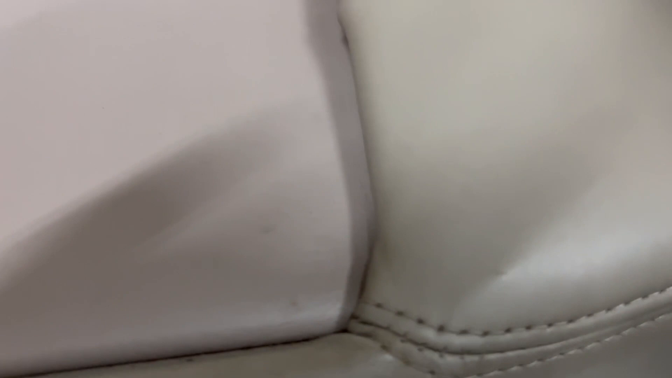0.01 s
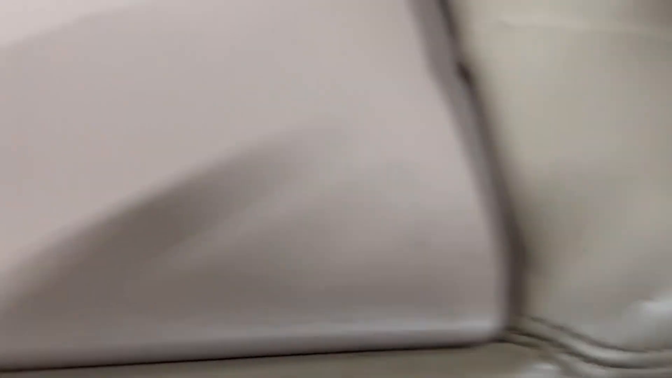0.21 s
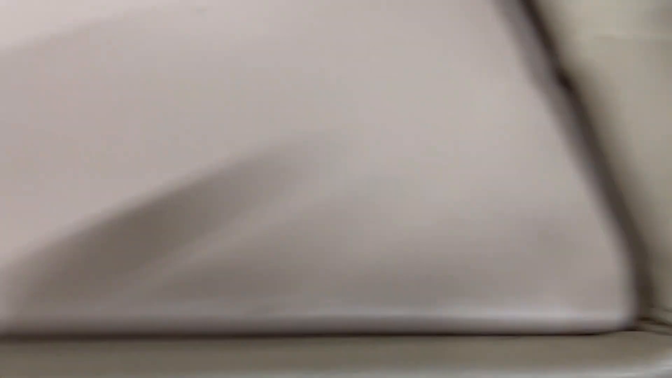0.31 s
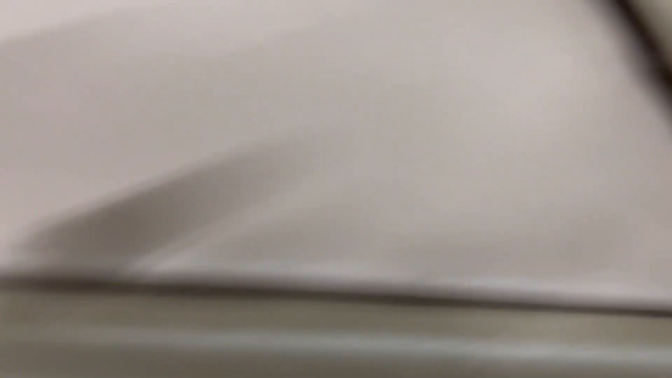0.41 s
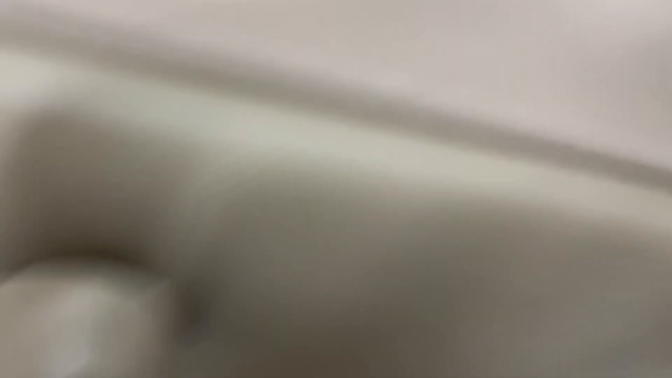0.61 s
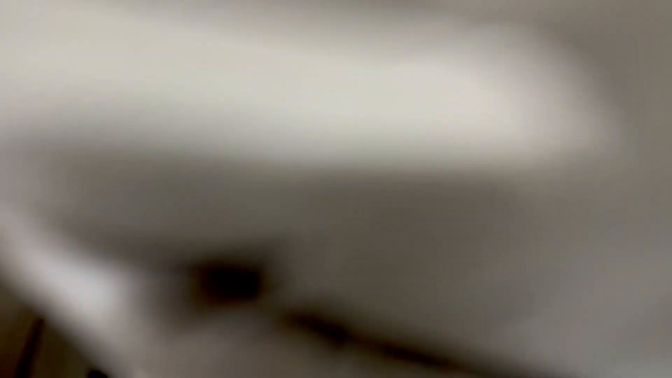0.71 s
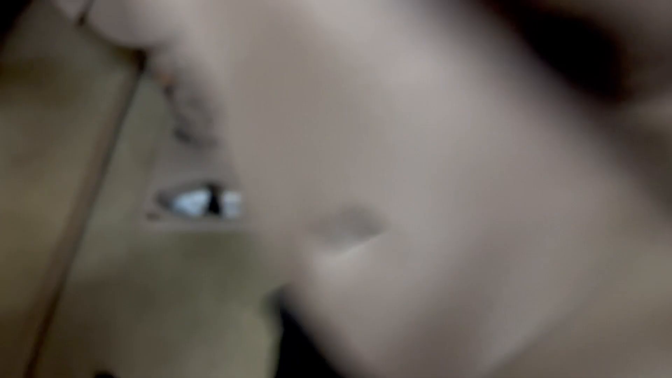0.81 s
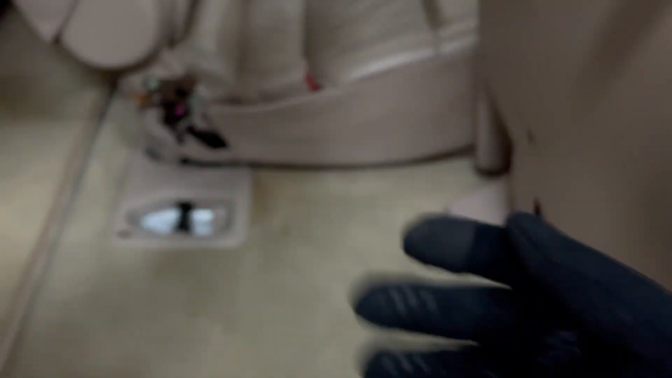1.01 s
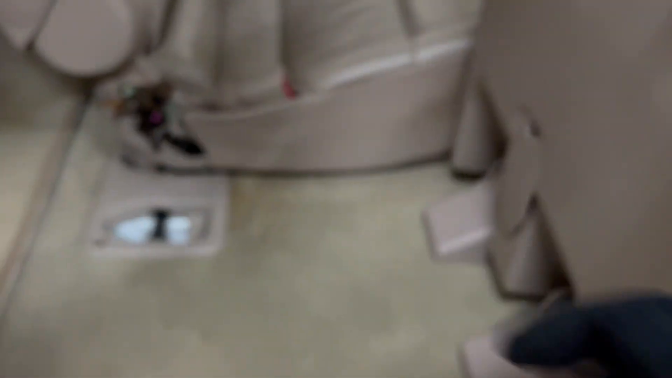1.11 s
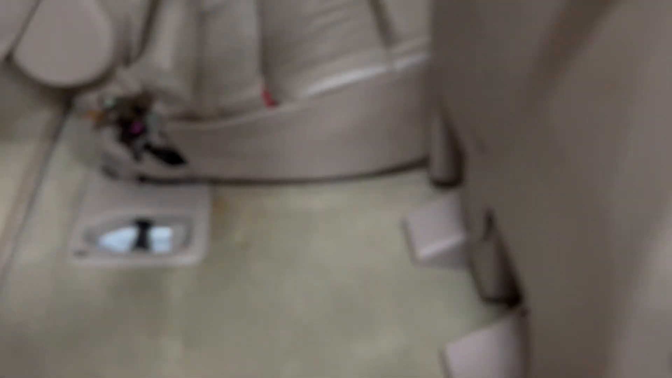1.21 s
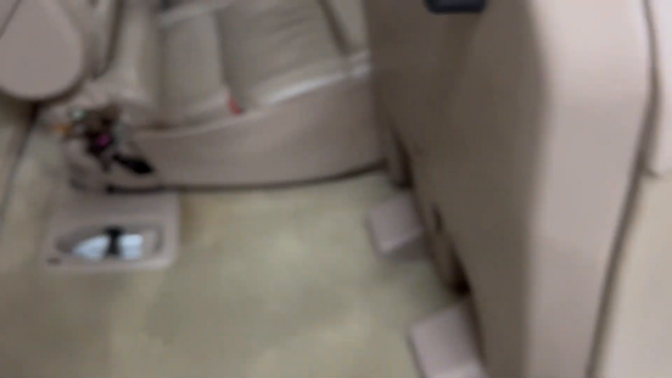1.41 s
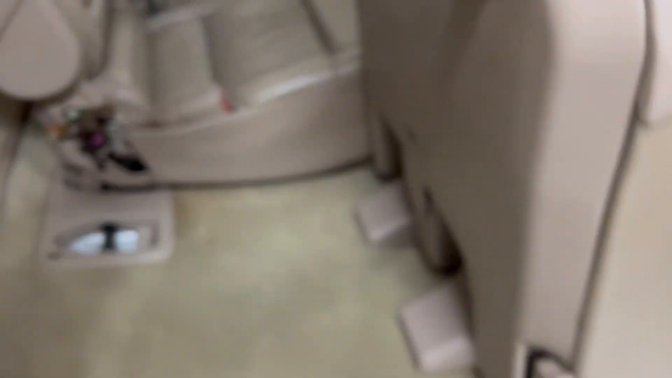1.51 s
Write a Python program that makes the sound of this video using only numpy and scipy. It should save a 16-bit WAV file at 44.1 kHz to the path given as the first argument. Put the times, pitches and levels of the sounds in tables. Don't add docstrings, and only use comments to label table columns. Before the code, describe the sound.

A car seat latch snaps open sharply, leather drags softly, then the seat lands with dull thumps

```python
import sys
import numpy as np
from scipy import signal
from scipy.fft import rfft, irfft
from scipy.io import wavfile
from scipy.ndimage import uniform_filter1d

SR = 44100
rng = np.random.default_rng(int(sys.argv[2]) if len(sys.argv) > 2 else 0)


def nominal_scale(level):
    x = np.asarray(level, float) / 20
    return 10 ** x


def persist_wave(psi):
    counts = np.round(np.clip(psi, -1, 1) * 32767).astype(np.int16)
    wavfile.write(sys.argv[1], SR, np.atleast_2d(counts).T)


N = 70560
T = np.arange(N) / SR

# start in seconds, contact length in seconds.
BLOW_TIMES = [
    (.1795, .006),
    (.1865, .004),
    (.2080, .004),
    (.2190, .004),
    (.2222, .0032),
    (.2362, .003),
    (.2600, .004),
    (.3598, .003),
]
# level in dB, treble tilt in dB per octave, left-right in dB.
BLOW_LEVELS = [(-42, 9, 7.5), (-41, 1, 6), (-49.5, 6, 1), (-29, 3, -5.5), (-4, 2.5, 6), (-38, -50, 2.5),
               (-17, 7, 3), (-35.5, -15, 4)]
# frequency in Hz, level in dB, t60 in seconds.
STEEL_MODES = [(985, -17, 0.06), (1330, -1, 0.029), (1920, -23, 0.039), (1980, 7, 0.062),
               (2580, 0.5, 0.015), (3200, -5, 0.023), (4015, -11.5, 0.03), (5050, -7, 0.012),
               (6330, -20, 0.016), (7740, -22, 0.017), (7790, -6, 0.008), (8770, -11, 0.011),
               (12040, -21.5, 0.02), (12450, -19.5, 0.021)]
# start in seconds, level in dB, pitch in Hz, t60 in seconds,
# push in seconds.
PART_PINGS = [(.1805, -41.5, 3840, 0.023, 0.00088), (.1865, -35, 3200, 0.02, 0.0012),
              (.206, -42, 2020, .2, 0.028), (.211, -45, 7200, .06, 0.0052),
              (.207, -34, 3000, 0.064, 0.0031), (0.2178, -30, 7800, .01, 0.00046),
              (0.224, -12, 1375, 0.028, 0.0011), (0.2233, -15, 2604, .025, 0.00087),
              (.223, -31, 3150, 0.037, 0.0011), (0.224, -20, 4370, 0.035, 0.0011),
              (.261, -22, 1473, 0.05, 0.0014), (.261, -19.5, 1843, 0.035, 0.0013),
              (.261, -19.5, 2235, .03, 0.0013), (0.2623, -23, 2755, 0.022, .001),
              (.26, -21, 5160, 0.018, .001), (.261, -38, 5950, .025, .001), (.266, -26.5, 448, 0.12, .004),
              (1.075, -31, 3856, .02, .001), (1.076, -29.5, 3120, 0.022, .001),
              (1.076, -28, 1830, 0.036, .002), (1.083, -30, 1486, 0.043, .002),
              (1.104, -34, 1346, .08, 0.0051), (1.155, -34, 1500, .04, .004), (1.095, -36, 2400, .04, .004),
              (1.199, -20.5, 1480, 0.0096, 0.00044), (1.1985, -25.5, 2090, 0.0098, .0005),
              (.935, -30, 1094, 0.027, 0.00043), (.935, -38, 1740, .02, 0.00046),
              (.935, -45, 2540, .015, .0005), (.936, -31, 613, 0.034, 0.0015),
              (.2245, -17.5, 3960, .015, 0.00045), (.2615, -26.5, 1156, 0.032, .001),
              (.238, -35, 3150, .08, .006), (.262, -25, 1990, 0.046, 0.0011),
              (.302, -16.5, 1650, 0.014, 0.00074), (1.198, -27.5, 2770, 0.0091, 0.0004),
              (1.1988, -29, 3200, 0.025, 0.00045), (1.199, -32, 3920, 0.026, .0005),
              (1.2, -35, 4330, .03, 0.00056), (1.227, -37, 1518, 0.038, 0.0018),
              (1.242, -40.5, 3780, 0.017, .001)]
# start in seconds, level in dB, pitch in Hz, t60 in seconds, push in seconds.
SEAT_THUMPS = [(0.065, -29.5, 196, 0.043, 0.0024), (.227, -19.5, 319, 0.095, 0.0012),
               (0.2363, -8.5, 126, 0.095, 0.002), (0.261, -20, 186, .12, 0.0043),
               (0.3032, -18, 484, 0.026, 0.00077), (.303, -28, 945, 0.042, 0.001),
               (0.303, -28, 1376, 0.02, 0.0011), (0.298, -27, 71, 0.13, 0.0029),
               (0.44, -29.5, 141.4, 0.092, 0.0079), (.936, -23, 456, 0.036, 0.0021),
               (.947, -18.5, 296, 0.017, 0.001),
               (1.052, -26.5, 118, 0.31, 0.0091), (1.073, -18.5, 619, 0.031, 0.00057),
               (1.08, -12, 400, 0.022, 0.0024), (1.085, -11, 168.4, 0.089, 0.0018),
               (1.0972, -4, 61.7, 0.088, 0.012), (1.105, -19, 282, 0.046, 0.0012),
               (1.114, -2.5, 134, 0.035, 0.0083), (1.148, -4, 63, 0.061, 0.0069),
               (1.157, -35, 350, 0.031, 0.0016), (1.1745, -15, 87, 0.1, 0.0075),
               (1.1995, -10.5, 292, 0.021, 0.0021), (1.200, -18, 552, 0.025, 0.0012),
               (1.212, -13, 136, 0.046, 0.0033), (1.402, -35, 72, 0.29, 0.011),
               (1.086, -28.5, 519, 0.14, 0.0029), (1.222, -26.5, 203, 0.092, 0.0053),
               (1.345, -35, 131, 0.25, 0.025), (1.082, -16, 270, 0.04, 0.00092),
               (1.236, -21.5, 72, 0.11, 0.0038), (1.291, -33, 42.7, 0.51, 0.0025),
               (1.319, -33.5, 64, 0.25, 0.0058), (1.5935, -23, 643, 0.023, 0.0033)]
# start in seconds, level in dB, centre in Hz, t60 in seconds,
# left-right in dB.
TRIM_KNOCKS = [(0.05, -47, 740, 0.06, 3), (0.1328, -38.5, 1170, 0.01, 9), (0.302, -39, 930, 0.031, 13),
               (0.391, -40.5, 1310, 0.034, -4), (0.596, -43, 1480, 0.024, 4),
               (0.8674, -38.5, 1470, 0.031, 15), (0.894, -38, 806, 0.042, 12),
               (0.934, -34.5, 1480, 0.025, 6), (0.992, -38.5, 3120, 0.028, 5),
               (1.072, -32.5, 1100, 0.15, -1), (1.0746, -26, 8400, 0.11, -2), (1.079, -32, 1500, 0.17, 2.5),
               (1.137, -33.5, 1140, .1, 0), (1.198, -41, 2430, 0.024, 10), (1.235, -38, 970, 0.046, 5),
               (1.298, -44, 975, 0.024, 11), (1.491, -55, 1850, 0.45, 1), (1.596, -39, 1800, 0.018, -17),
               (0.222, -19.5, 528, 0.13, 3.5), (0.262, -32, 614, 0.056, -4),
               (1.076, -23.5, 472, 0.19, -0.5), (1.1, -31.5, 700, 0.14, 6), (1.2, -27, 470, 0.058, 4.5),
               (.36, -49, 400, 0.073, 17), (1.158, -31, 235, 0.1, 2)]
# time in seconds, level in dB, rub share in dB.
LEATHER_DRAG = [(0, -59.5, -1), (.06, -67.5, 8.5), (.11, -64.5, -0.5), (.3, -54, 7), (.405, -63, 3.5),
                (.43, -55, -1), (.56, -61, -5.5), (.68, -50, -5.5), (.76, -47.5, -3), (.86, -50.5, -1.5),
                (0.999, -46, -5), (1.092, -44, 1), (1.17, -48, 4.5), (1.25, -55, 3.5), (1.34, -60.5, -1),
                (1.42, -74, -11.5), (1.52, -62, -8), (1.6, -51.5, -1)]
# frequency in Hz, density in dB per Hz.
SLIDE_SPECTRUM = [(1200, 12), (2000, 6), (4000, 1), (6000, 1.5), (8800, 2.5), (10800, -2.5), (12200, 1),
                  (16000, -4.5)]
# frequency in Hz, density in dB per Hz.
CREAK_SPECTRUM = [(88, -75), (150, -4.5), (239, -3), (366, -4.5), (531, -4.5), (791, -11.5), (1710, -15.5),
                  (4000, -36), (5200, -60.5), (8800, -120)]
# frequency in Hz, density in dB per Hz.
HUM_SPECTRUM = [(12, 17), (25, -21), (45, -6.5), (75, -0.5), (110, -5.5), (239, -14.5), (369, -17.5),
                (555, -24), (698, -29), (1620, -32.5), (9000, -48.5), (16000, -68)]

PORT_TURN_RAD = 0.66


def unit(x):
    return x / np.sqrt(np.mean(x ** 2))


def peak(x):
    return x / np.abs(x).max()


def noise():
    return rng.standard_normal(N)


def walk(rate_hz):
    width = int(SR / rate_hz)
    return unit(uniform_filter1d(uniform_filter1d(noise(), width), width))


def fade(start_s, rise_s, t60_s):
    since = np.maximum(T - start_s, 0)
    return (1 - np.exp(-since / rise_s)) * np.exp(-np.log(1000) * since / t60_s)


def band(x, lo_hz, hi_hz):
    sos = signal.butter(2, [lo_hz, min(hi_hz, SR / 2.2)], "band", fs=SR, output="sos")
    return signal.sosfilt(sos, x)


def colour(x, spectrum):
    hz, db = np.array(spectrum, float).T
    f = np.maximum(np.arange(N // 2 + 1) * SR / N, 1)
    gain = nominal_scale(np.interp(np.log(f), np.log(hz), db, left=-60, right=-60))
    return unit(irfft(rfft(x) * gain, N))


def ring(x, hz, t60_s):
    pole = np.exp(2j * np.pi * hz / SR - np.log(1000) / (t60_s * SR))
    return signal.lfilter([1], [1, -pole], x + 0j).imag


def pan(db):
    return nominal_scale(np.array([[db / 2], [-db / 2]]))


def pair(draw):
    mid = draw()
    side = -PORT_TURN_RAD * signal.hilbert(mid).imag + 0.4 * draw()
    wide_hz = 400
    side = signal.sosfilt(signal.butter(1, wide_hz, "high", fs=SR, output="sos"), side)
    return np.array([mid + side, mid - side])


def latch():
    crack_db, clack_db, tail_db, tail_t60_s, longest_ring_s = -1, -3, -15.5, 0.072, 0.045
    hiss = band(pair(noise), 570, 9700)
    grit = pair(noise)
    out = np.zeros((2, N))
    for (start_s, contact_s), (db, treble_db, pan_db) in zip(BLOW_TIMES, BLOW_LEVELS):
        push = grit * fade(start_s, contact_s / 2, 4 * contact_s)
        modes = 0
        for hz, mode_db, t60_s in STEEL_MODES:
            tilted_db = mode_db + treble_db * np.log2(hz / 2000)
            modes = modes + nominal_scale(tilted_db) * peak(ring(push, hz, min(t60_s, longest_ring_s)))
        crack = nominal_scale(crack_db + treble_db) * peak(band(push, 4260, 12000))
        clack = nominal_scale(clack_db) * peak(band(push, 1070, 3300))
        tail = nominal_scale(tail_db) * hiss * fade(start_s, 0.0013, tail_t60_s)
        out += nominal_scale(db) * pan(pan_db) * (peak(modes) + crack + clack + tail)
    return out


def pings():
    flutter = nominal_scale(3.5 * walk(520))
    turn = np.array([[PORT_TURN_RAD], [-PORT_TURN_RAD]])
    out = np.zeros((2, N))
    for start_s, db, hz, t60_s, push_s in PART_PINGS:
        angle = 2 * np.pi * hz * (T - start_s) + turn
        out += nominal_scale(db) * fade(start_s, push_s, t60_s) * np.sin(angle)
    return pan(2.5) * flutter * out


def thumps():
    sag, lag_s = 0.041, 0.0002
    port_shift_s = lag_s * np.array([[-0.5], [0.5]])
    out = np.zeros((2, N))
    for start_s, db, hz, t60_s, push_s in SEAT_THUMPS:
        since = np.maximum(T - start_s, 0)
        sag_s = sag * t60_s / 4 * (1 - np.exp(-4 * since / t60_s))
        cycles = hz * (since + sag_s + port_shift_s)
        out += nominal_scale(db) * fade(start_s, push_s, t60_s) * np.sin(2 * np.pi * cycles)
    return out


def knocks():
    spread = 1 + 0.66
    grit = pair(noise)
    air = nominal_scale(-10.5) * band(grit, 1500, 6300)
    out = np.zeros((2, N))
    for start_s, db, hz, t60_s, pan_db in TRIM_KNOCKS:
        body = unit(band(grit, hz / spread, hz * spread)) + air
        out += nominal_scale(db) * pan(pan_db) * body * fade(start_s, 0.00067, t60_s)
    return out


def seam():
    start_s, end_s, slips_per_s = 0.692, 0.835, 200
    hz, t60_s, level_db = 1800, 0.0083, -52.5
    slip_count = np.floor(np.cumsum(slips_per_s * (1 + 0.2 * walk(40))) / SR)
    slips = np.diff(slip_count, prepend=0) * nominal_scale(2 * noise())
    puff = signal.lfilter([1], [1, -0.97], slips) * noise()
    body = ring(puff, hz, t60_s) + 0.63 * ring(puff, 0.6 * hz, t60_s)
    swell = np.clip((T - start_s) / 0.051, 0, 1) * np.clip((end_s - T) / 0.0086, 0, 1)
    return pan(12.3) * nominal_scale(level_db) * unit(body) * swell


def grains():
    grains_per_s, spread_db = 830, 5
    hits = rng.random(N) < grains_per_s / SR
    return hits * nominal_scale(spread_db * noise()) * np.sign(noise()) + 0.16 * noise()


def leather():
    t, db, rub_db = np.array(LEATHER_DRAG, float).T
    slide = colour(pair(noise), SLIDE_SPECTRUM) * nominal_scale(2.0 * walk(27))
    creak_db = 6 + np.interp(T, t, rub_db) + 1.8 * walk(29)
    creak = colour(pair(grains), CREAK_SPECTRUM) * nominal_scale(creak_db)
    return nominal_scale(np.interp(T, t, db)) * (slide + creak)


def hum():
    level_db = -45
    return colour(pair(noise), HUM_SPECTRUM) * nominal_scale(level_db + walk(10))


def cabin(hard):
    t60_s, level_db, top_hz, length = 0.15, -16, 4800, SR // 4
    echo = band(rng.standard_normal((2, length)), 180, top_hz)
    echo = echo * fade(0.00071, 0.00097, t60_s)[:length]
    echo = echo / np.sqrt((echo ** 2).sum(1, keepdims=True))
    return nominal_scale(level_db) * signal.fftconvolve(hard, echo, axes=1)[:, :N]


def ports(x):
    merge_hz, in_step_hz, lag_s = 8000, 8300, 0.00027
    f = np.arange(N // 2 + 1) * SR / N
    share = 1 / (1 + (merge_hz / np.maximum(f, 1)) ** 16)
    spec = rfft(x)
    late = 2 * np.pi * lag_s * (f - in_step_hz)
    even = 0.68 * spec[0] * np.exp(1j * np.array([0 * late, late]))
    return irfft((1 - share) * spec + share * even, N)


def scene():
    hard = latch() + pings() + pan(1.0) * thumps() + knocks() + seam()
    soft = pan(6.5) * leather() + pan(1.0) * hum()
    return ports(hard + cabin(hard) + soft)


def top_cut(x):
    return signal.sosfilt(signal.butter(12, 16650, fs=SR, output="sos"), x)


def record(dry):
    top_hz, leak_db, drive = 15720, -32, 0.8
    cut = signal.sosfiltfilt(signal.ellip(8, 0.1, 50, top_hz, fs=SR, output="sos"), dry)
    leaky = cut + nominal_scale(leak_db) * (dry - cut)
    mix = np.tanh(drive * leaky) / drive
    return top_cut(mix)


dry = scene()
out = record(dry)
persist_wave(out)
```